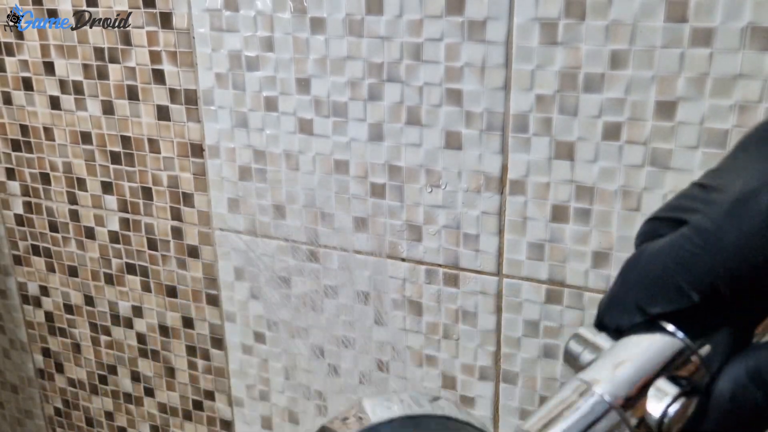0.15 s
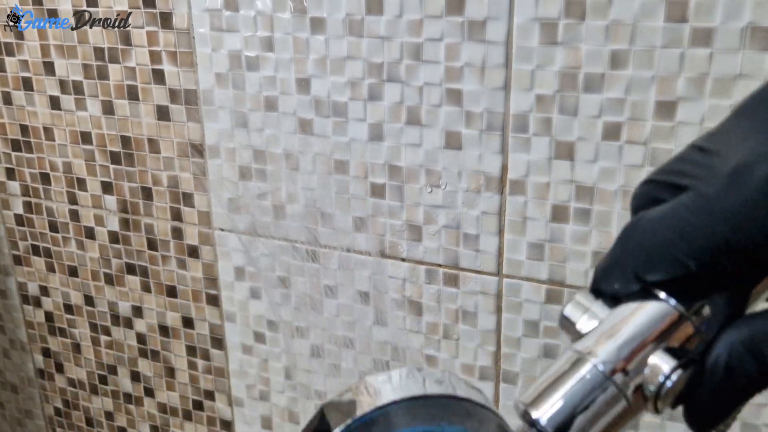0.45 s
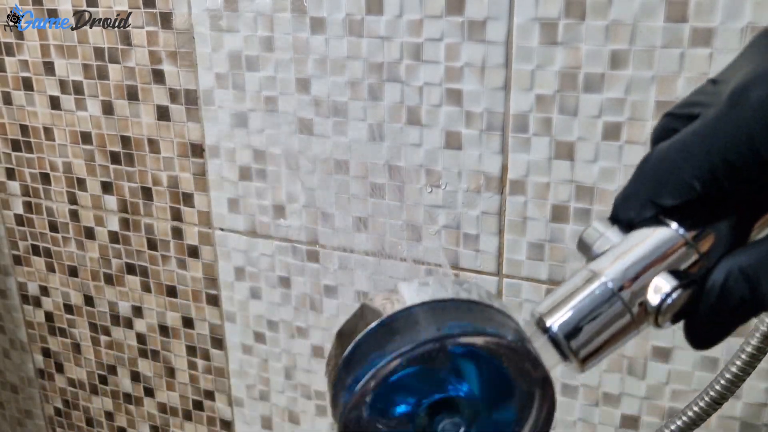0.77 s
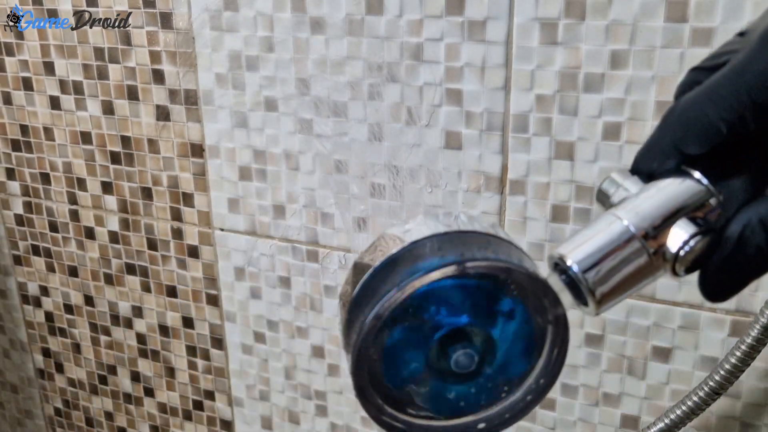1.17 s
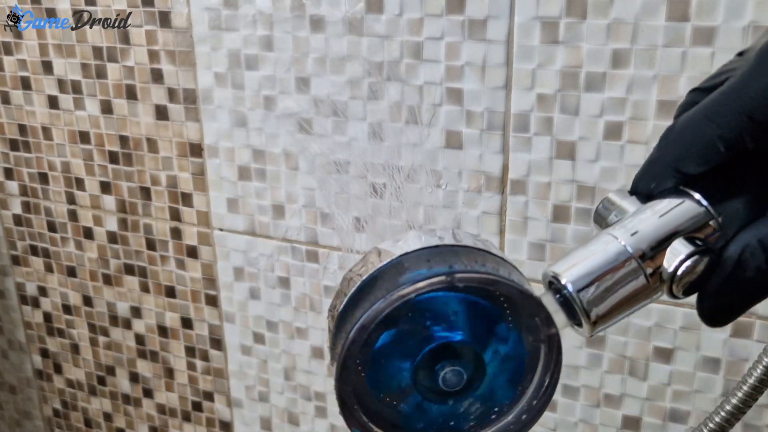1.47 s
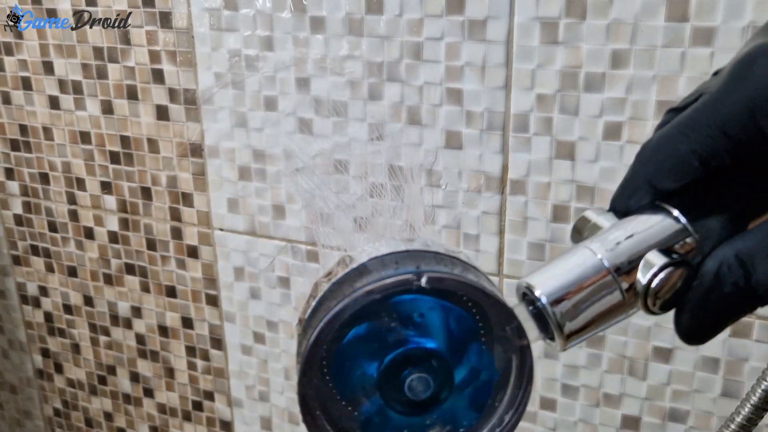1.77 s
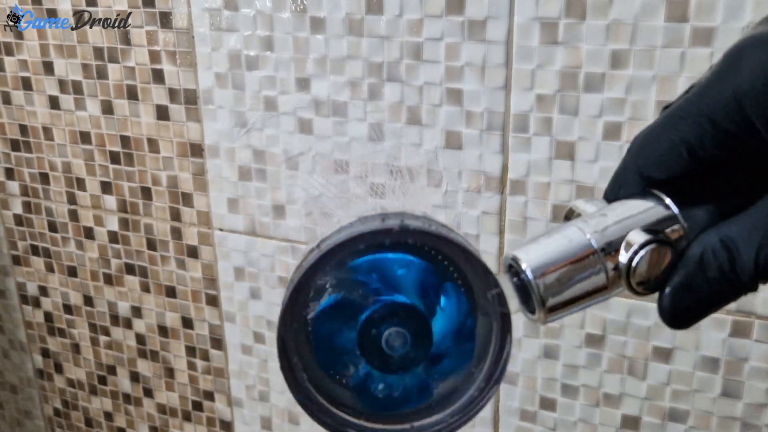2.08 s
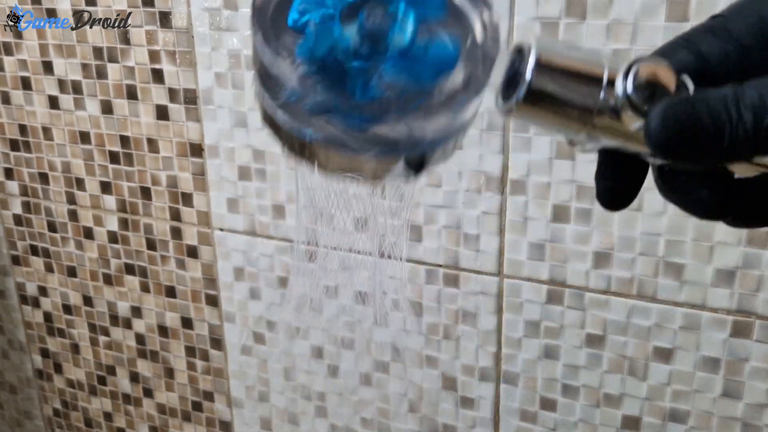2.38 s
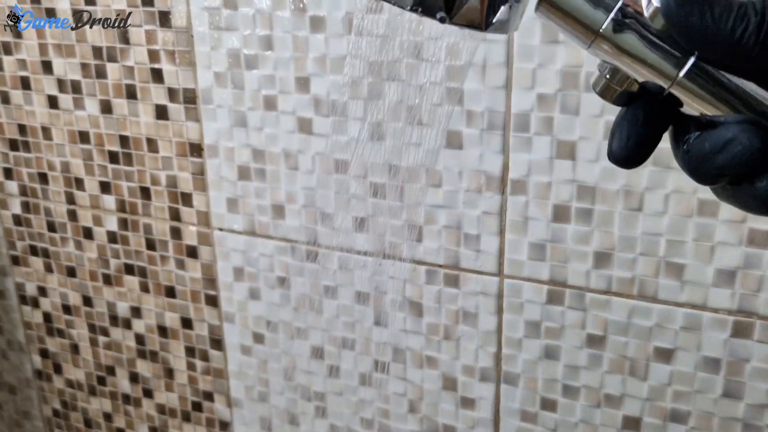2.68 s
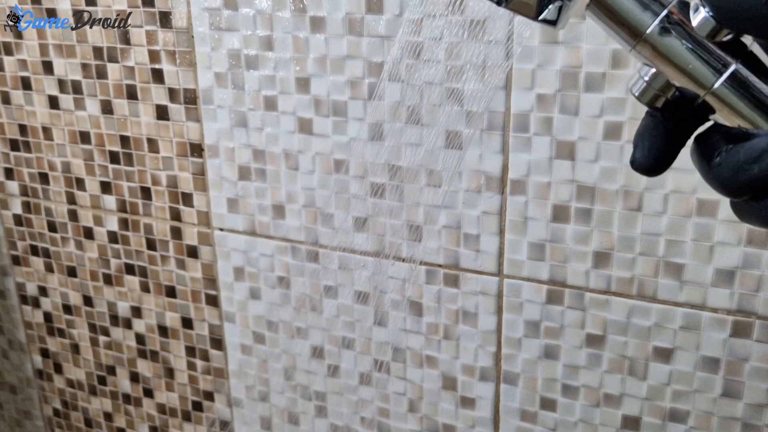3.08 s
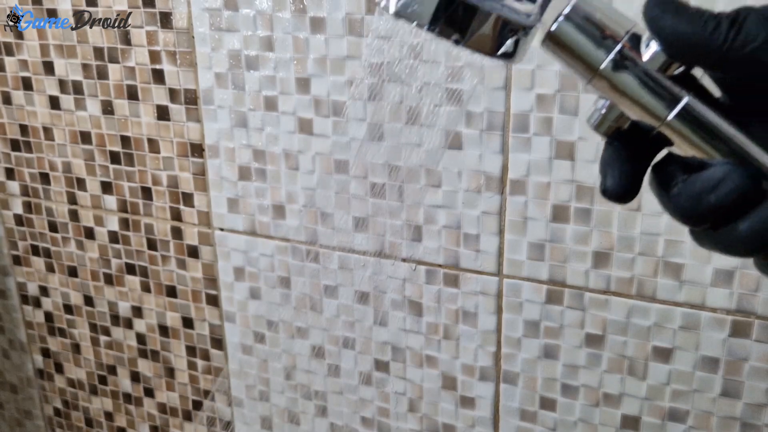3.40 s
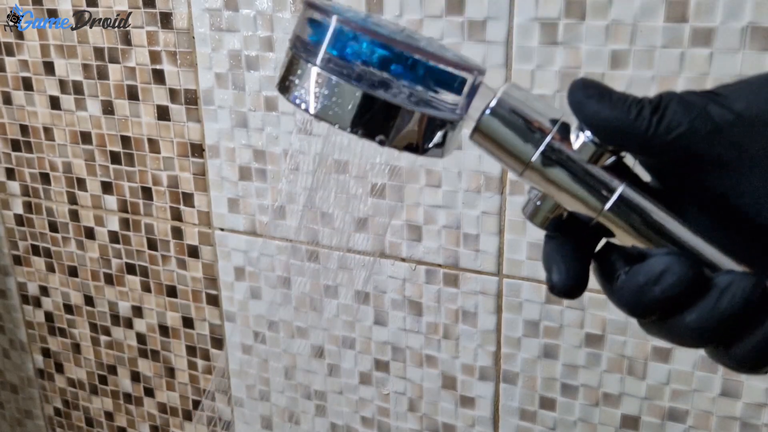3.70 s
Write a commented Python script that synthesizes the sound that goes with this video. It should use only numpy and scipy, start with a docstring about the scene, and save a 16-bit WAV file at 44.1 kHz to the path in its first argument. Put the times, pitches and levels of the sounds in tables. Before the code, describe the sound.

Shower spray hisses against bathroom tiles over soft run-off patter in a tub; after a few dull slaps and knocks, the hiss dips, surges brightly and fades back, heard close in stereo.

```python
"""A handheld shower head sprays a tiled wall in a small bathroom: dense droplet ticks over fine noise make the hiss.
The head is turned over: the hiss dips, then surges as the jets strike close by, and settles again.
Run-off patters into the tub, its drops ringing resonances that drum softly, over a low wavering hum.
Noise bursts make the slaps, splashes and a rumble of the shifting hand; decaying sines make a few dull knocks."""
import sys
import numpy as np
from scipy import signal
from scipy.fft import rfft, irfft, next_fast_len
from scipy.io import wavfile
from scipy.ndimage import uniform_filter1d, map_coordinates

SR = 44100
rng = np.random.default_rng(int(sys.argv[2]) if len(sys.argv) > 2 else 0)


def dump(signal):
    """Clip the signal to [-1, 1] and save it as 16-bit WAV at the path in sys.argv[1]."""
    limited = np.clip(np.atleast_2d(signal).T, -1, 1)
    pcm = np.round(limited * 32767).astype(np.int16)
    wavfile.write(sys.argv[1], SR, pcm)


N = 169785


def amp(db):
    """Decibels to gain."""
    return 10 ** (np.asarray(db) / 20)


def unit(x):
    """Scaled to rms 1."""
    return x / np.sqrt(np.mean(x ** 2) + 1e-20)


def along(points, hz):
    """Breakpoints over frequency, read on a log axis."""
    f, v = np.transpose(points)
    return np.interp(np.log(hz + 1), np.log(f + 1), v)


def curve(rows):
    """Breakpoints over time, read at every sample."""
    return np.interp(np.arange(N) / SR, *np.transpose(rows))


def wobble(rate):
    """A smooth random curve, rate knots a second."""
    return map_coordinates(rng.standard_normal(4000), [np.arange(N) * rate / SR], mode="wrap")


def filtered(x, response):
    """x times a response of frequency."""
    m = next_fast_len(N + SR // 2)
    hz = np.fft.rfftfreq(m, 1 / SR)
    return irfft(rfft(x, m) * response(hz), m)[..., :N]


# stereo width as left-right correlation [f/Hz, likeness -1 to 1]
LIKENESS = [(60, 0.93), (180, 1), (300, 0.86), (550, 0.48), (800, 0.32), (1500, -0.043), (4000, 0.024),
            (15000, 0.027)]
# stereo balance, left minus right [f/Hz, level/dB]
LEAN = [(60, 3), (150, -3.3), (280, 4), (600, 1.3), (2500, 1.9), (5000, 1), (9000, 2.5), (15000, 3.5)]


def placed(pair):
    """Two unrelated signals as left and right: alike in the bass, mostly leaning left; rms 1."""
    def mid_side(hz):
        turn = np.arccos(np.clip(along(LIKENESS, hz), -1, 1)) / 2
        return np.array([np.cos(turn), np.sin(turn)])

    def balance(hz):
        return amp(np.outer([.5, -.5], along(LEAN, hz)))

    mid, side = filtered(pair, mid_side)
    return unit(filtered(np.array([mid + side, mid - side]), balance))


def coloured(pair, spectrum):
    """A pair given a spectrum and placed in the room."""
    return placed(filtered(pair, lambda hz: amp(along(spectrum, hz))))


def impacts(per_s, scatter_db, wash_db):
    """Random drop impacts of scattered size on a wash of ones too fine to tell apart."""
    struck = rng.random((2, N)) < per_s / SR
    signs = rng.choice([-1, 1], (2, N))
    sizes = amp(scatter_db * rng.standard_normal((2, N)))
    wash = amp(wash_db) * rng.standard_normal((2, N))
    return unit(unit(struck * signs * sizes) + wash)


def walls(pair, echo_db, reach_s, count=14):
    """Early reflections from the close tiled walls: random delays and signs for each channel."""
    delays = rng.uniform(.05, 1, (2, count)) * reach_s
    signs = rng.choice([-1, 1], (2, count))
    echoes = []
    for x, ds, gs in zip(pair, delays, signs):
        echoes.append(sum(g * np.roll(x, int(d * SR)) for d, g in zip(ds, gs)))
    return pair + amp(echo_db) * np.array(echoes) / np.sqrt(count)


def patchy(pair, depth_db):
    """The colour drifts in small random time-frequency patches as the jets wander."""
    z = signal.stft(pair, nperseg=512)[2]
    across_hz = uniform_filter1d(rng.standard_normal(z.shape[1:]), size=5, axis=0)
    field = unit(uniform_filter1d(across_hz, size=12, axis=1))
    return unit(signal.istft(z * amp(depth_db * field), nperseg=512)[1][:, :N])


def bursts(rows, spectrum, attack_s, release_s):
    """Short gushes of noise: a rise, a sagging hold for the row's length, a release."""
    t, env = np.arange(N) / SR, np.zeros(N)
    for start, db, length in rows:
        age = np.maximum(t - start, 0)
        rise = 1 - np.exp(-age / attack_s)
        fall = np.exp(-.5 * age / length - np.maximum(age - length, 0) / release_s)
        env += amp(db) * rise * fall
    return env * coloured(rng.standard_normal((2, N)), spectrum)


def resonances(table, f):
    """Response of band-pass resonances (centre, width, level), alternating in sign."""
    total = 0
    for k, (centre, width, db) in enumerate(table):
        ring = 1j * f * width / (centre * centre - f * f + 1j * f * width)
        total = total + amp(db) * ring * (-1) ** k
    return total


# spray on the wall, before trim and flutter [t/s, level/dB]
SPRAY = [(0, -54), (.14, -55.5), (.22, -52.5), (.32, -57), (.38, -53.5), (1, -53), (2.38, -52.5),
         (2.49, -55), (2.58, -58.5)]
# spray once the head is turned over, before trim and flutter [t/s, level/dB]
SURGE = [(2.61, -56.5), (2.64, -51.5), (2.666, -46.5), (2.72, -44.5), (2.8, -44.5), (2.885, -41),
         (2.95, -42.5), (3.02, -42.5), (3.11, -46), (3.2, -47.5), (3.27, -46), (3.33, -45), (3.43, -50),
         (3.54, -51), (3.6, -54.5), (3.64, -54), (3.68, -51), (3.75, -51.5), (3.85, -54)]
# hiss colour with the jets far from the tiles, relative [f/Hz, level/dB]
FAR_TILES = [(300, -33), (900, -17), (1500, -17.5), (2400, -12), (3000, -7), (4200, -6), (5400, -4.5),
             (6900, -5.5), (7600, -4.5), (8700, -6.5), (9500, -1.5), (10400, -.5), (11000, -2.5),
             (11600, -0.5), (13800, -.7), (15400, -1.5)]
# hiss colour with the jets close by, relative [f/Hz, level/dB]
NEAR_TILES = [(300, -27.5), (1000, -16.5), (1800, -17), (2100, -8.5), (2550, -11), (3050, -2.5),
              (4100, -2.5), (5200, 0.5), (6100, -1.9), (6900, -2.5), (7500, -0.3), (8700, -4), (9500, 2),
              (10400, 1), (11000, -1), (11600, 1), (13800, -2.5), (15400, -0.25)]
FAR_DB, NEAR_DB = -51.5, -41.5  # untrimmed levels at which the jets sound wholly far and wholly near
SPRAY_DB, FLUTTER_DB = 7.5, .28  # level trim; depth of each of two flutters
DROPLETS_PER_S = 5000  # in each channel, before placing


def spray():
    """Droplets on the tiles; the closer the jets strike, the louder and fuller the hiss."""
    level_db = curve(SPRAY + SURGE)
    near = np.clip((level_db - FAR_DB) / (NEAR_DB - FAR_DB), 0, 1)
    far_drops = impacts(DROPLETS_PER_S, scatter_db=1.0, wash_db=1.5)
    far_hiss = coloured(walls(far_drops, echo_db=-9, reach_s=.03), FAR_TILES)
    near_drops = impacts(DROPLETS_PER_S, scatter_db=3.5, wash_db=3)
    near_hiss = coloured(walls(near_drops, echo_db=-15.5, reach_s=.025), NEAR_TILES)
    # equal-power crossfade from far to near
    hiss = patchy(np.sqrt(1 - near) * far_hiss + np.sqrt(near) * near_hiss, depth_db=1.05)
    flutter_db = FLUTTER_DB * (wobble(17) + wobble(70))
    return amp(SPRAY_DB + level_db + flutter_db) * hiss


# run-off falling into the tub, before trims and sputter [t/s, level/dB]
RUNOFF = [(0, -61), (.45, -61.5), (1.24, -65), (2.12, -65), (2.55, -67), (2.9, -68.5), (3.55, -65),
          (3.85, -65)]
# colour of the patter, relative [f/Hz, level/dB]
PATTER = [(30, -9.5), (110, -11.5), (170, -14.5), (260, -6), (450, -15), (650, -6.5), (800, -2.5),
          (1100, -7), (1500, -2), (2500, -3), (6000, -23)]
# resonances of the tub and the room, relative [f/Hz, width/Hz, level/dB]
TUB = [(204.2, 7.5, 6), (222.6, 16, 0), (291.2, 10, -2), (341, 19, -2), (409.2, 11.3, 1), (473, 9.9, -2),
       (533, 26, -0.5), (602, 20, -8.5), (746, 15, 5), (1023, 34, -1), (1228, 30, -2)]
RUNOFF_DB, TUB_DB, SPUTTER_DB = 3.5, -3, .8  # trims of patter and drum; sputter depth
DRIPS_PER_S = 500  # in each channel, before placing


def runoff():
    """Heavier drops patter into the tub, and a like stream of drops sets its resonances drumming."""
    drops = impacts(DRIPS_PER_S, scatter_db=0.5, wash_db=0.5)
    patter = coloured(walls(drops, echo_db=-10, reach_s=.025), PATTER)
    drum_hits = impacts(DRIPS_PER_S, scatter_db=4, wash_db=-3)
    drum = placed(filtered(drum_hits, lambda f: resonances(TUB, f)))
    level = amp(curve(RUNOFF) + SPUTTER_DB * wobble(17))
    return level * (amp(RUNOFF_DB) * patter + amp(TUB_DB) * drum)


# low hum, before trims [t/s, level/dB]
HUM = [(0, -73), (.3, -89), (.55, -77.5), (1.4, -79.5), (1.85, -76.5), (2.03, -70), (2.35, -75.5),
       (2.8, -78.5), (3.1, -75), (3.55, -74), (3.8, -69)]
# colour of the rumble around the hum, relative [f/Hz, level/dB]
HUM_COLOUR = [(20, -29), (40, -16), (52, -15), (61, -4), (70, -5), (82, -25), (94, -13), (112, -24),
              (300, -71)]
HUM_DB, HUM_LINE_DB = -0.5, 1  # trims of rumble and tone
HUM_HZ = 61  # pitch about which the tone wavers


def hum():
    """A low tone of wavering pitch in a narrow rumble of noise."""
    pitch_hz = HUM_HZ + 1.76 * wobble(7.1)
    line = np.sqrt(2) * np.sin(2 * np.pi * np.cumsum(pitch_hz) / SR)
    rumble = coloured(rng.standard_normal((2, N)), HUM_COLOUR)
    return amp(curve(HUM)) * (amp(HUM_DB) * rumble + amp(HUM_LINE_DB) * line)


# slaps of water landing in the tub, level before the envelope [t/s, level/dB, length/s]
SLAPS = [(.232, -52, 0.055), (.345, -57, 0.054), (.975, -56.5, 0.035), (2.735, -53.5, 0.093),
         (2.87, -59.5, 0.16)]
# colour of the slaps, relative [f/Hz, level/dB]
SLAP = [(100, -34), (250, -14.5), (380, 3.5), (800, 2), (1500, 5), (2300, 1), (4000, 0), (12000, -31)]


def slaps():
    """Gathered water lands in short dull slaps of noise."""
    return bursts(SLAPS, SLAP, attack_s=0.0015, release_s=0.011)


# knocks, level before the mode levels [t/s, level/dB]
KNOCKS = [(.236, -54), (.349, -65.5), (1.643, -58), (1.717, -57), (1.794, -59)]
# modes of a dull knock on the tub, before scatter [f/Hz, level/dB, t60/s]
KNOCK_MODES = [(414, -17, 0.075), (485, -6, 0.24), (564, 4, .07), (675, 1.5, 0.03), (696, -10, 0.19),
               (735, -1, 0.083), (776, 6, .06)]


def knocks(attack_s=.002):
    """Soft, dull knocks on the tub: decaying modes, each scattered in level and phase."""
    out, t = np.zeros((2, N + SR)), np.arange(SR // 3) / SR
    rise = 1 - np.exp(-t / attack_s)
    for start, db in KNOCKS:
        knock = out[:, round(start * SR):][:, :len(t)]  # a view, so adding to it fills out
        for hz, mode_db, t60 in KNOCK_MODES:
            phase = rng.uniform(0, 2 * np.pi) + rng.normal(0, 0.17, (2, 1))
            decay = amp(db + mode_db + rng.normal(0, 2.1) - 60 * t / t60)
            knock += decay * np.sin(2 * np.pi * hz * t + phase) * rise
    return out[:, :N]


# the hand shifts, level before the envelope [t/s, level/dB, length/s]
SHIFTS = [(1.92, -74, .3)]
# colour of the handling rumble, relative [f/Hz, level/dB]
HANDLING = [(15, 2), (30, 10), (45, -6), (90, -19), (200, -40), (1000, -82)]


def handling():
    """The shifting hand rumbles: a slow-edged burst of deep noise."""
    return bursts(SHIFTS, HANDLING, attack_s=.03, release_s=.06)


# brighter splashes around the surge, level before the envelope [t/s, level/dB, length/s]
SPLASHES = [(2.973, -45, 0.021), (3.305, -61, 0.029)]
# colour of the splashes, relative [f/Hz, level/dB]
SPLASH = [(500, -23), (1700, -33), (2050, 3), (2900, -2), (3600, 4.5), (4500, -16), (12000, -20)]


def splashes():
    """Gathered water lands in brief splashes of noise, brighter than the slaps."""
    return bursts(SPLASHES, SPLASH, attack_s=0.0012, release_s=.01)


def scene():
    """Everything heard in the bathroom."""
    return spray() + runoff() + hum() + slaps() + knocks() + handling() + splashes()


TOP_HZ = 15500


def record(dry):
    """A sharp band limit: nothing at or above TOP_HZ is kept."""
    return filtered(dry, lambda hz: hz < TOP_HZ)


dry = scene()
out = record(dry)
dump(out)
```